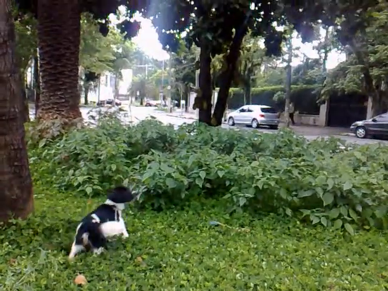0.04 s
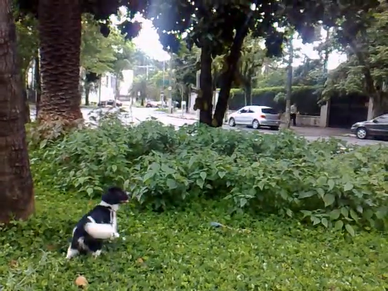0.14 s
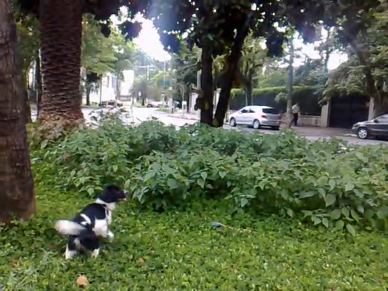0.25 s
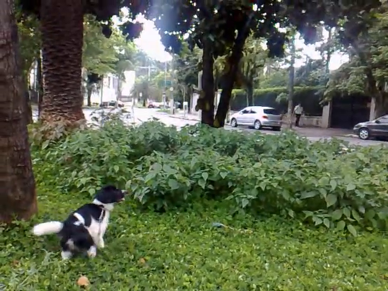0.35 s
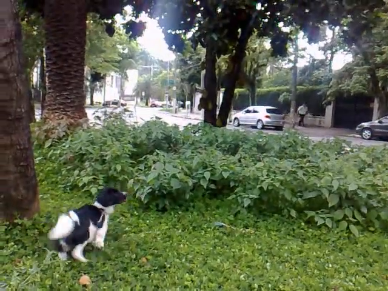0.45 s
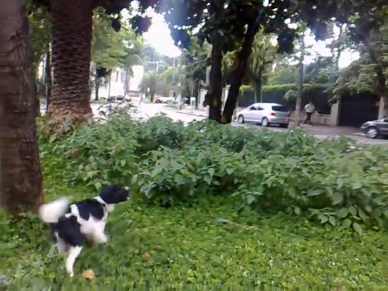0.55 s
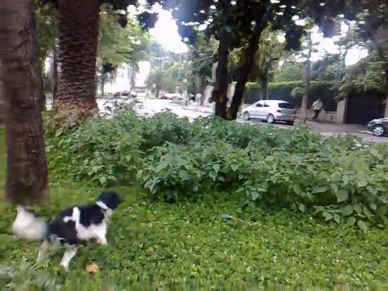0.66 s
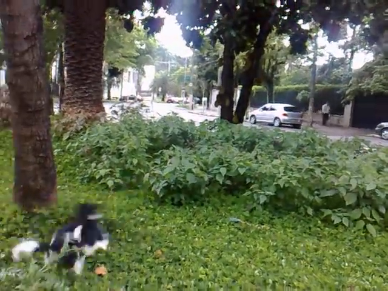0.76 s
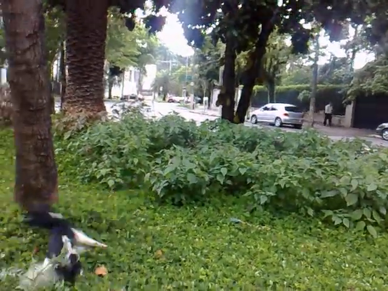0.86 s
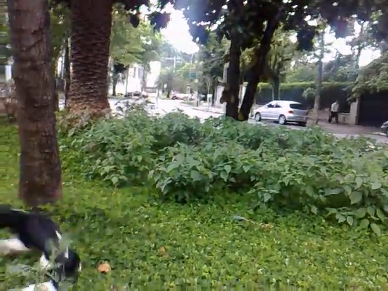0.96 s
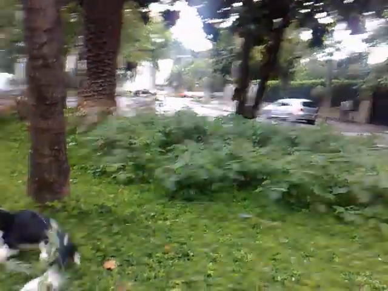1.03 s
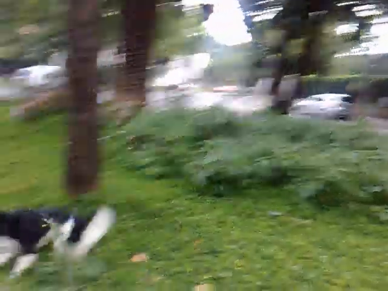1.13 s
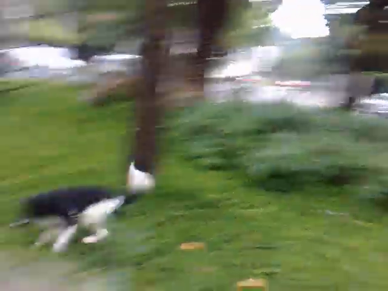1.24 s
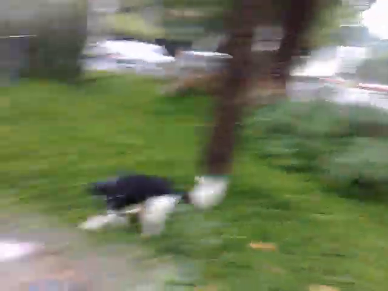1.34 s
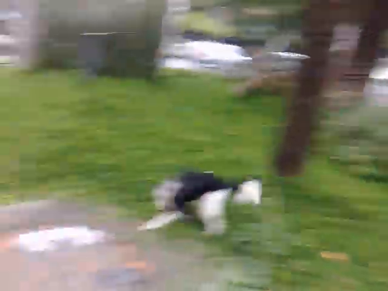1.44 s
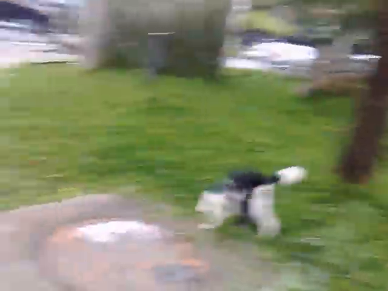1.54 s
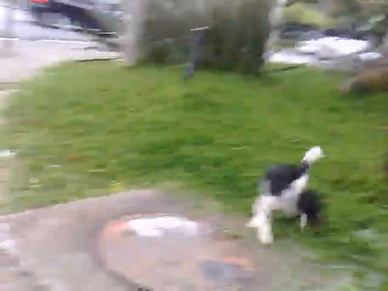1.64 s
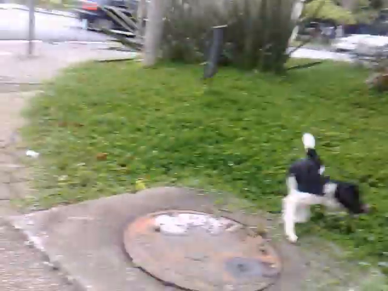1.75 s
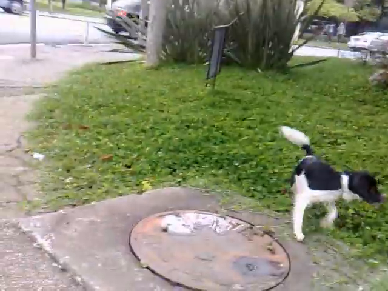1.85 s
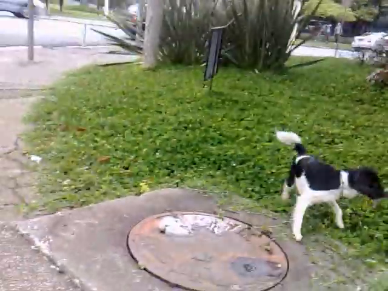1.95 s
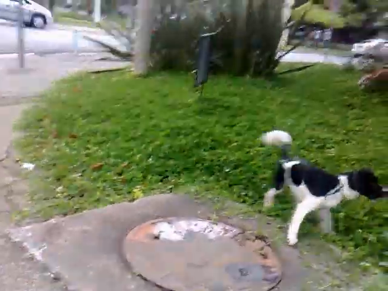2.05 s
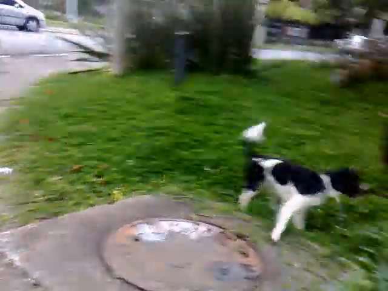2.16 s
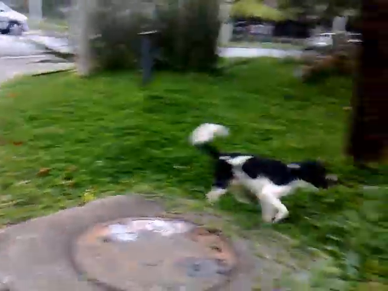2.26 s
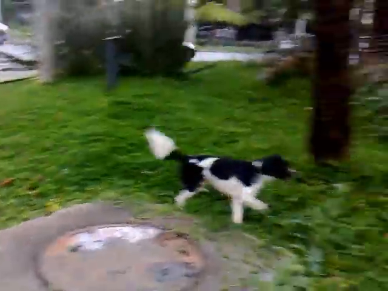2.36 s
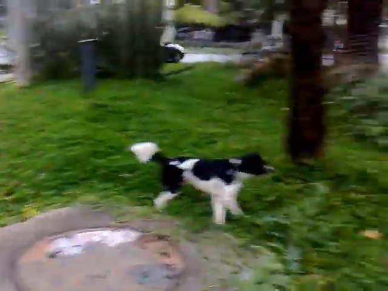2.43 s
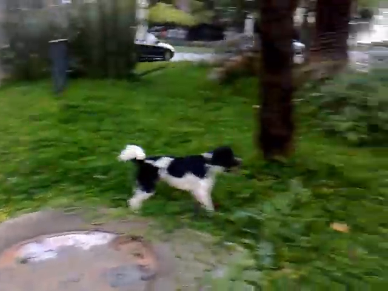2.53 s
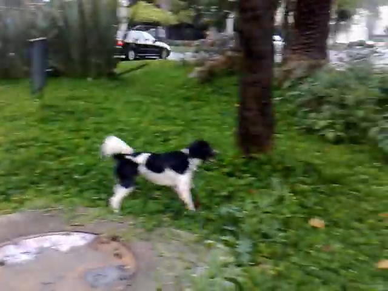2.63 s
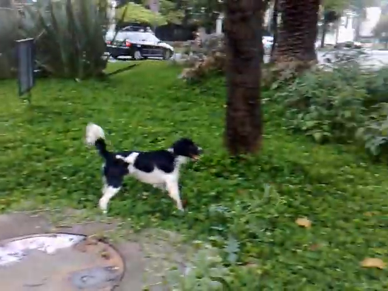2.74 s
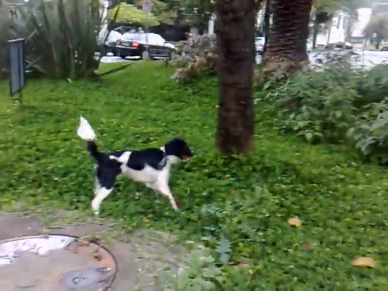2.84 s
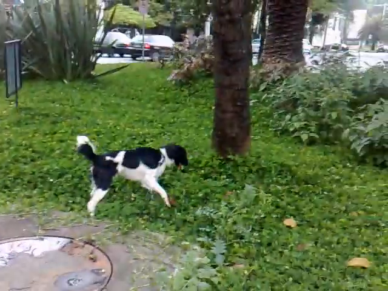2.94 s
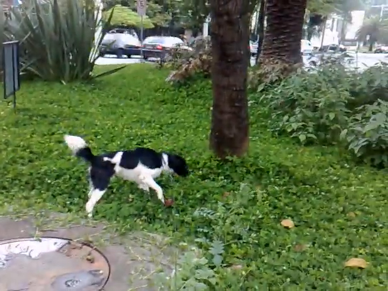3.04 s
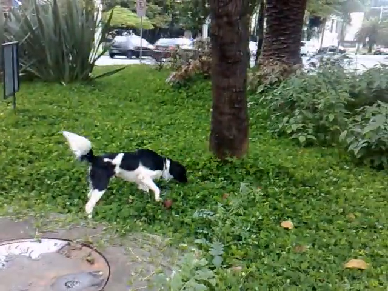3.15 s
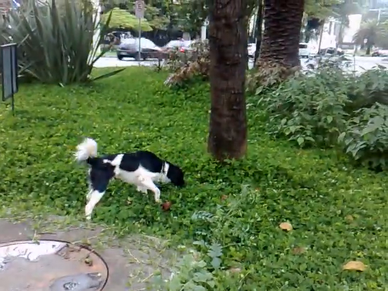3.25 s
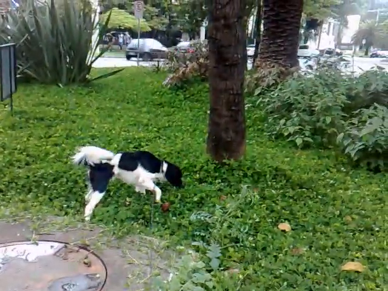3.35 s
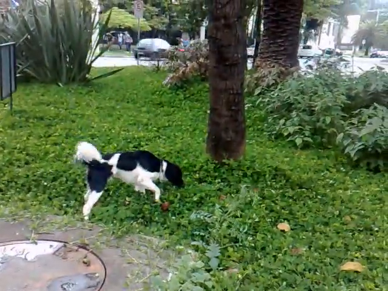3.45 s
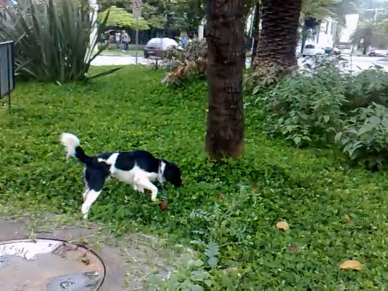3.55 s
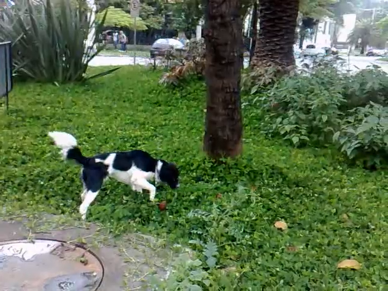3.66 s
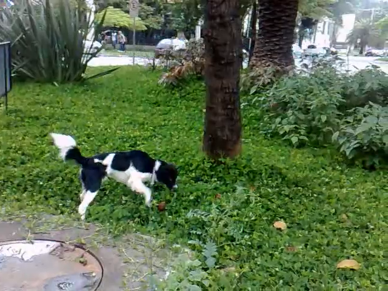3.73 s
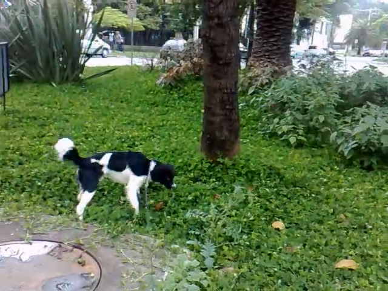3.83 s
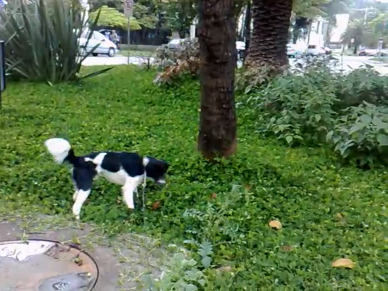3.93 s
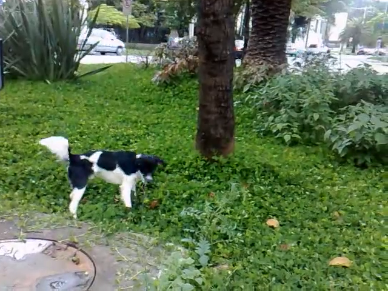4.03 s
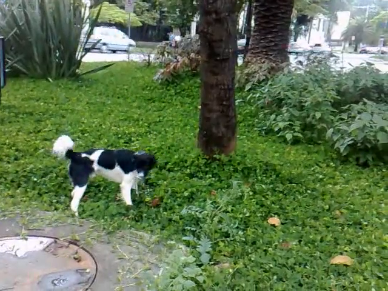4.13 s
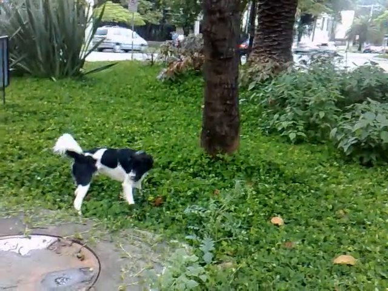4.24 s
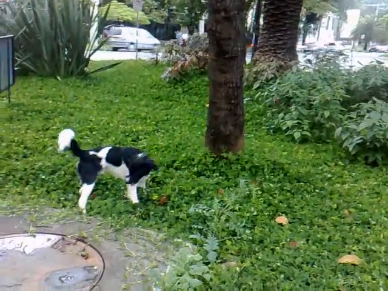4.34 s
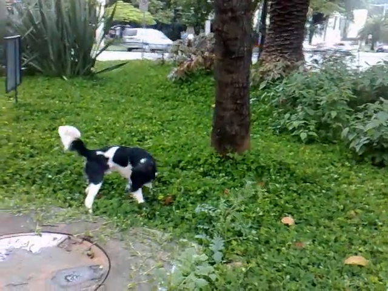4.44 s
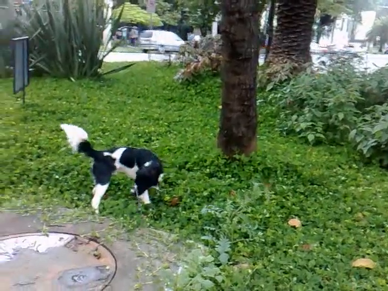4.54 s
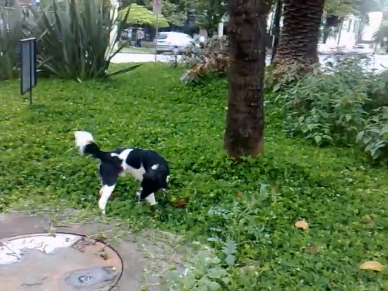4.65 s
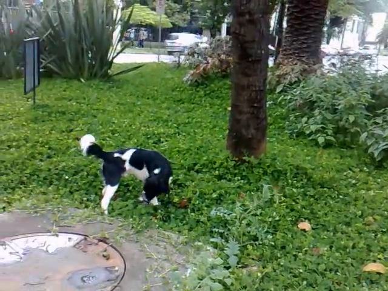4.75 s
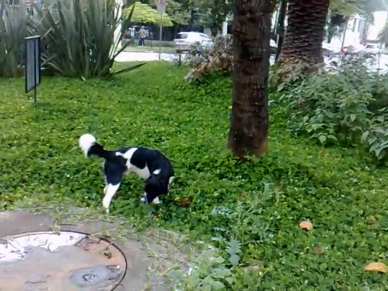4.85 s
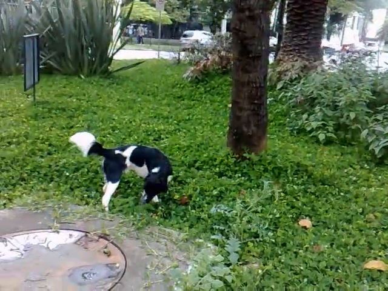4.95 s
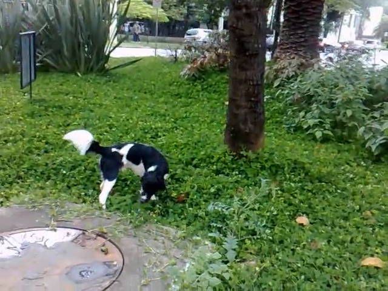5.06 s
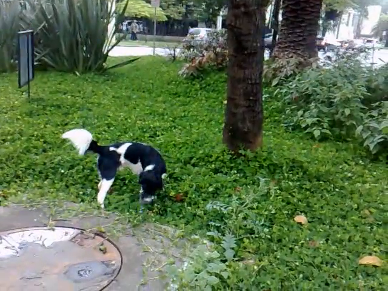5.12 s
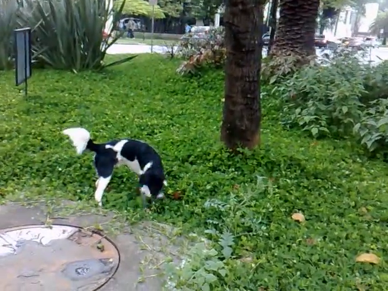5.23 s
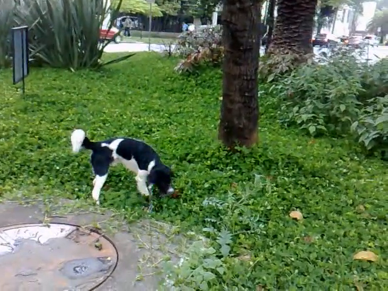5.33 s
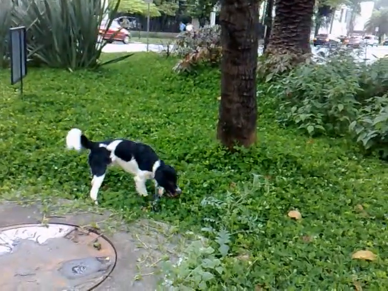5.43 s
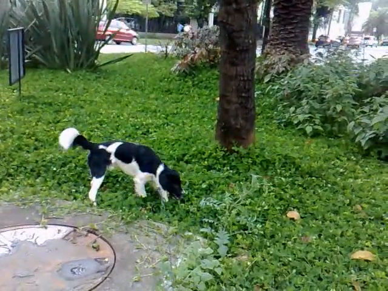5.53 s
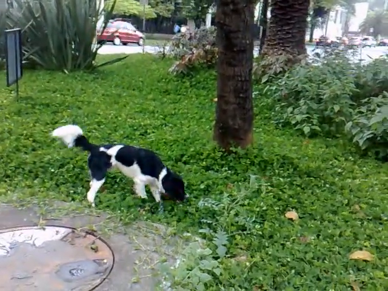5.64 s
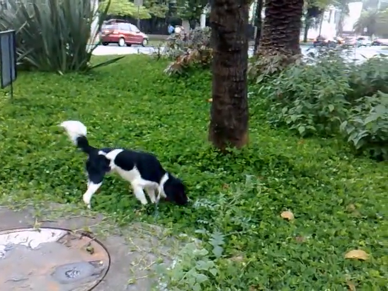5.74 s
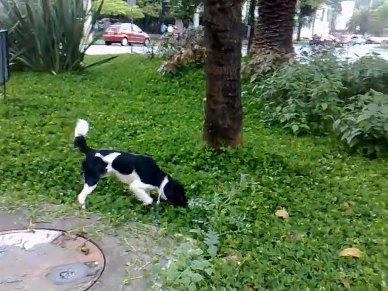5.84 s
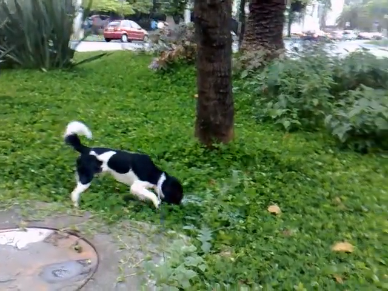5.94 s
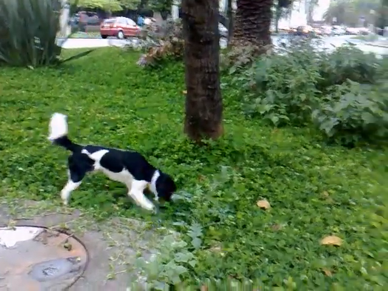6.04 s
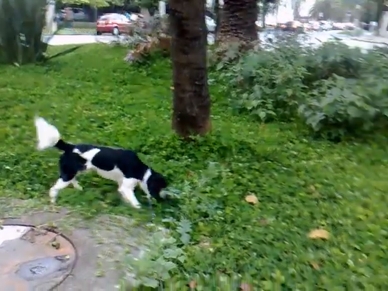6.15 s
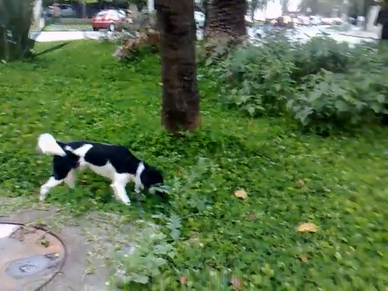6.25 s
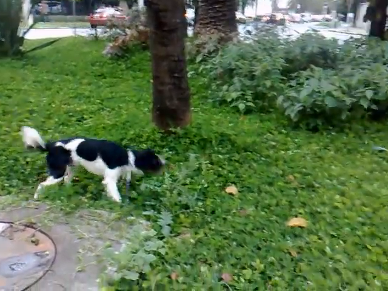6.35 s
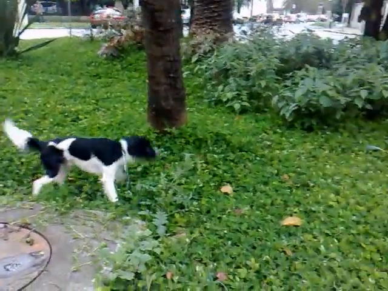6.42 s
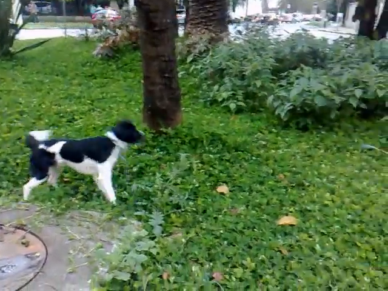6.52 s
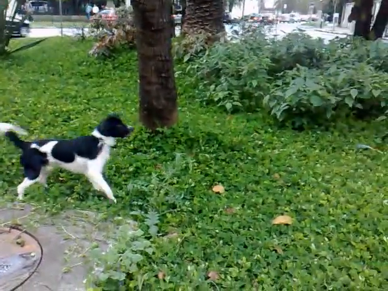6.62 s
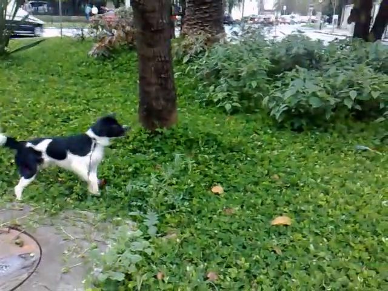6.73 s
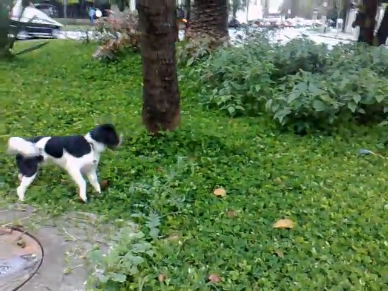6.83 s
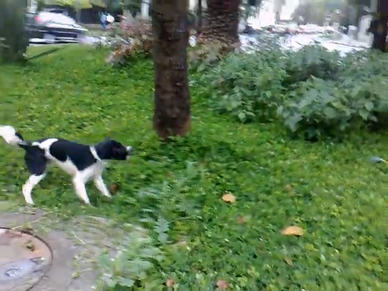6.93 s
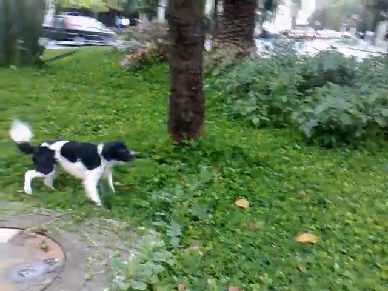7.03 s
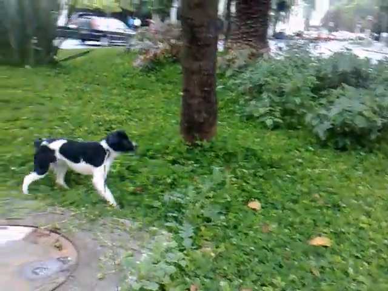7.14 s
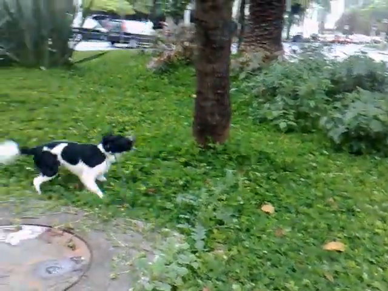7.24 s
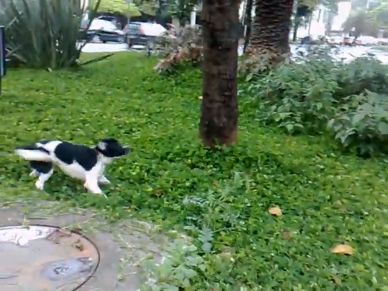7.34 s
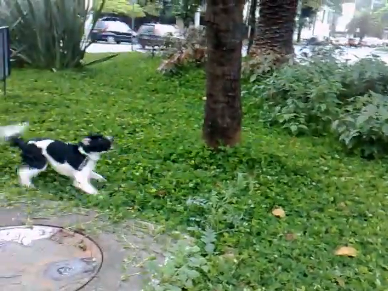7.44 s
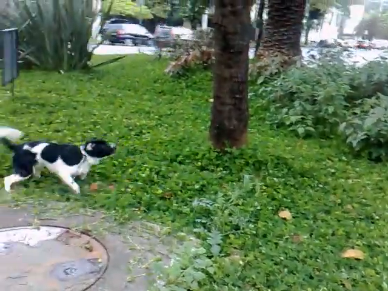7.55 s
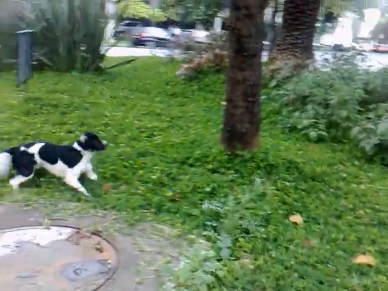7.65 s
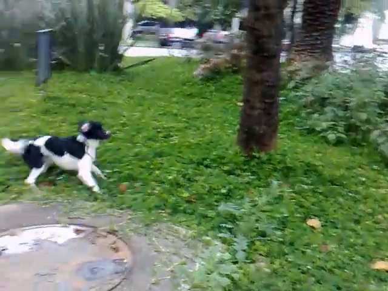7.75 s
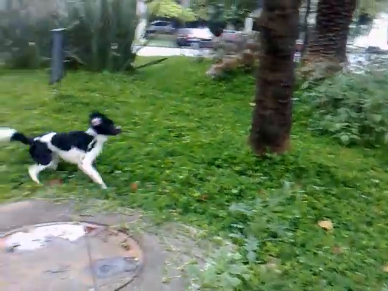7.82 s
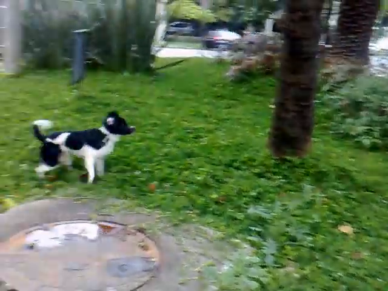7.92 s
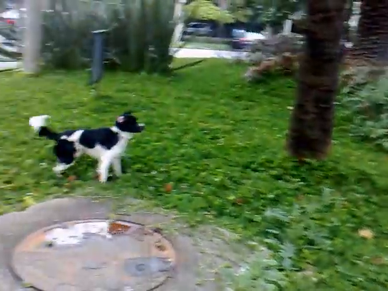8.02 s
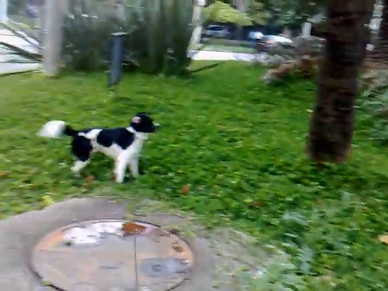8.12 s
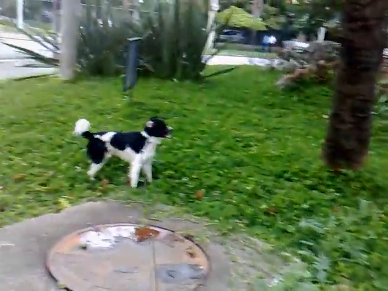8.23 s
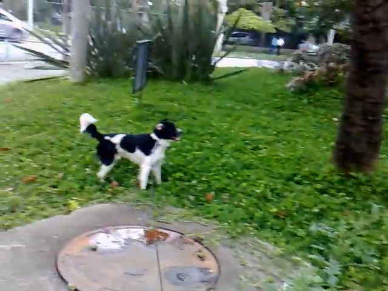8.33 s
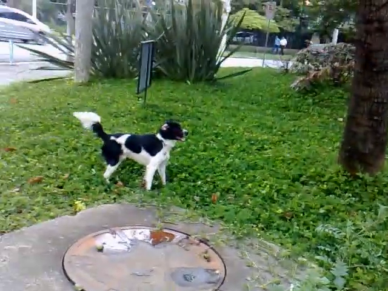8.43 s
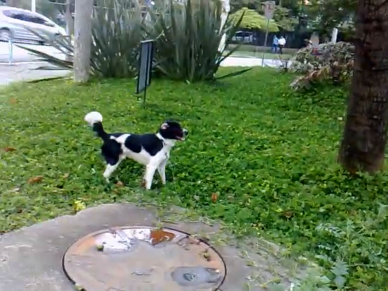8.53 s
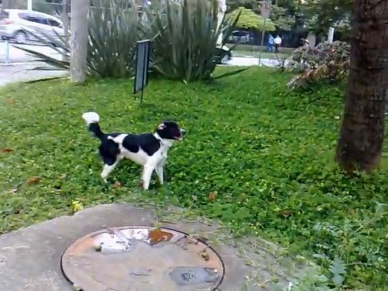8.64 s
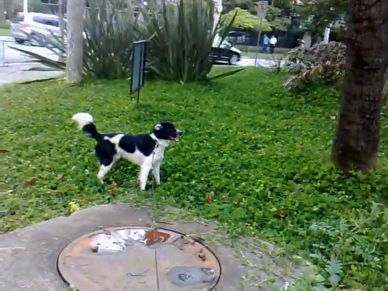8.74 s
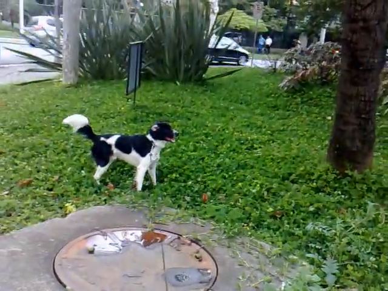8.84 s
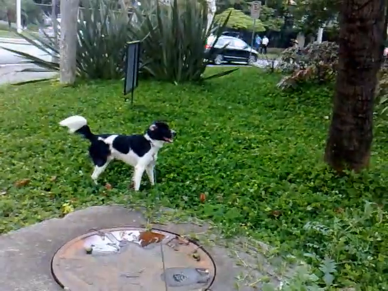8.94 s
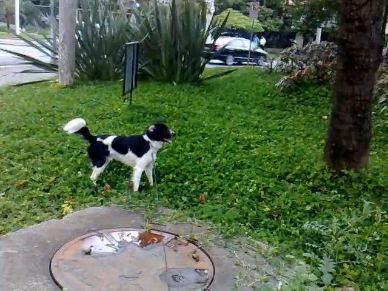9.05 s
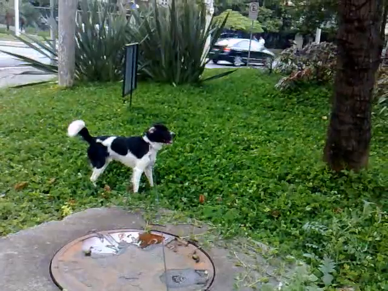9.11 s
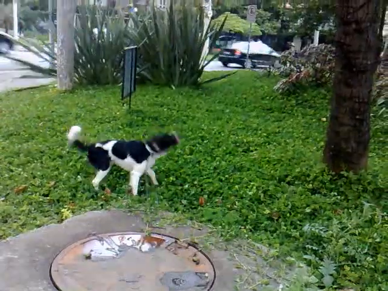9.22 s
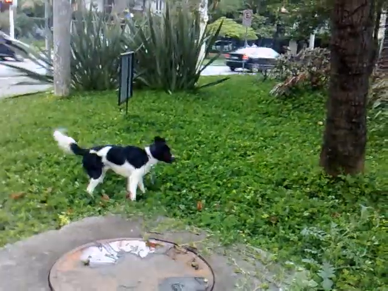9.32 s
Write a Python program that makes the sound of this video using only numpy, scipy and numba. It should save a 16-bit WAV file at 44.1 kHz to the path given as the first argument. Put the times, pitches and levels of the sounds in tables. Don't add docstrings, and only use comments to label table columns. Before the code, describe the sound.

A dog gives six short hoarse barks on a lawn beside a busy street, over tyre roar, engine drones and a leafy hiss.

```python
import sys
import numpy as np
from scipy import signal
from scipy.fft import rfft, irfft
from scipy.io import wavfile
from scipy.ndimage import uniform_filter1d, minimum_filter1d
from numba import njit

SR = 44100
rng = np.random.default_rng(int(sys.argv[2]) if len(sys.argv) > 2 else 0)


def bounce(signal):
    frames = np.transpose(np.atleast_2d(signal))
    limited = np.clip(frames, -1, 1)
    pcm = np.round(limited * 32767).astype(np.int16)
    wavfile.write(sys.argv[1], SR, pcm)


def invert_db(x):
    u = np.asarray(x, float) / 20
    return 10 ** u


N = 413658

# time_s, level_db
TRAFFIC = [(0, 0.5), (.75, 0), (2, -1), (3.8, 0), (6.4, -0.5), (7.4, 1.5), (9.38, 0.5)]
# time_s, level_db
TOP_HISS = [(0, 8.5), (.75, 6), (1, 1.5), (2.1, -1.5), (4.1, 3), (4.7, 1), (5.6, 4.5), (6.45, 0.5), (6.7, -6),
            (7.9, -6), (9.38, 0.5)]
# frequency_hz, level_db
ROAD_SPECTRUM = [(12, -36), (20, -15), (48, 0), (86, -2), (126, -4.5), (269, -6.5), (421, -14),
                 (1250, -12.5), (2380, -16.5), (2890, -14), (4920, -33.5), (6690, -37), (8140, -49),
                 (8850, -49.5), (15900, -55)]
ROAD_DB = -27
RUMBLE_FOLLOWS = 0.83

# loudest_s, audible_span_s, firing_hz, pull_hz_per_s, level_db
CARS = [
    (.5, 1.7, 86.7, 4, -27.5),
    (1.5, 0.84, 86.6, -3, -30),
    (3.149, 1.56, 97.3, 11.5, -31),
    (5.4, 3.26, 60.2, -1, -35),
    (8.2, .6, 112, -4, -33),
    (8.6, 0.67, 95, 5.5, -34.5),
    (9.4, 0.78, 101, -5.5, -33),
]
PASS_FADE_DB = 20

BRAKE_ON_S, BRAKE_OFF_S, BRAKE_DB, BRAKE_FADE_DB_PER_S = 3.99, 4.66, -55.5, 14
BRAKE_HZ, BRAKE_SAG_HZ_PER_S = 8750, 150
# time_s, extra_db, half_length_s
GRABS = [
    (4.05, 11, .012),
    (4.26, -11, .085),
    (4.287, 16, .01),
    (4.44, 1, .04),
    (4.482, 9, .01),
    (4.535, 6, .04),
]

# time_s, peak_db, length_s
PAW_STEPS = [(.04, -59.5, 0.037), (.74, -46, .04), (1.265, -49, 0.074), (1.477, -53, 0.089),
             (1.595, -53, .03), (1.86, -57, .03), (2.194, -54, .03), (2.222, -41, 0.047), (2.57, -57, .05),
             (2.897, -53, .05), (3.366, -53, .04), (3.65, -57, .04), (4.02, -52, .07), (5.73, -58, .06),
             (6.22, -56, .05), (7.0, -60, 0.042), (8.08, -54, 0.048)]

# time_s, peak_db, length_s, brightness_db
TWIG_CRACKS = [
    (2.222, -1, 0.00368, -8),
    (2.2264, -17, 0.0032, -14),
    (2.229, -20, 0.0022, -6),
    (2.2317, -16, 0.0031, -10),
]
TWIG_FROM_HZ, TWIG_TO_HZ = 5730, 2120
KNOCK_HZ, KNOCK_DB, CRACK_DB = 1500, -8, -12

# start_s, attack_s, hold_s, level_db, pitch_hz
BARKS = [
    (0.712, .062, 0.091, -13.5, 672.4),
    (6.447, 0.033, .078, -13.5, 701.8),
    (7.116, .02, .092, -6, 662.9),
    (7.363, 0.039, 0.072, -11.5, 648.5),
    (7.623, .04, .06, -10.5, 654.3),
    (9.328, .026, .085, -16.5, 705.4),
]
# attack_swell_db, early_tone_db, tone_break_share_of_hold, hold_sag_db, release_s
PHRASING = [(34.2, -6, .3, 7, .056), (39, 0.5, .5, 4.5, .058), (50, 4.5, .4, 13.5, .034),
            (24, 2, .35, 1.5, .06), (26.8, -0.5, .3, 5.5, .058), (38.8, -10.5, 0.42, 2, .05)]
# tone_break_db, throat_hz, cheek_hz, mouth_hz, third_hz
GAPES = [(2, 834, 1260, 1774, 2950), (-19.5, 960, 1385, 2300, 3210), (-11, 907, 1286, 1870, 2800),
         (-14, 828, 1240, 1730, 2830), (1, 750, 1390, 1620, 2740), (3, 830, 1220, 2060, 2960)]
# hoarseness_0_to_1, cheek_db, mouth_db, third_db, breath_db
COLOURS = [(.42, -3, -2, -0.5, -3.5), (.4, 4, -4, 2, 0.5), (.42, -1, 3.5, 4, 3),
           (.38, -5.5, 1.5, -5.5, -0.5), (.33, -7, -0.5, -8.5, -3.5), (0.4, 10.5, 0.5, -4.5, 2.5)]
# muffled_start_db, late_tone_db, mouth_drop_share, third_drop_share, facing_microphone_db
JAWS = [(-11.5, -4, .04, .02, -4), (1, 6, 0.19, 0.13, 6), (-0.5, 0.5, 0.14, .02, -1),
        (6, -5, 0.064, 0.062, -3), (0.5, 0.5, 0.039, .015, -8), (1.5, 0, .05, .02, 0)]
RASP_DB = (-1.5, 2, 1.5, 0, -2.5, 0.5)

PITCH_SHARE = (.92, 1.0, 1.0, 0.98, .96, .6)
CLEAR_DB = (0, 4.5, 0, 4, -1.2, 2)
BREAK_SHARE = (0.18, 0.15, 0.57, 0.52, 0, 0.6)
EARLY_SHARE = (0.92, 0.87, 0, 0, 0.61, 0.59)
LATE_SHARE = (0.43, 0.063, 0, 0.82, 0.85, 0)
HOARSE_SHARE = (.9, 1.0, 1.05, .95, .8, .2)
SAG_SHARE = (0, 0, 0.25, 1, 1.0, 0.68)
OPENING = (0, 0.21, 0.94, 1.0, 0.57, 0.12)
# level_db, then frequency_share
CHEEK_DB = (-8, -17.5, 2, 3, -8.5, 5)
CHEEK_SHARE = (0.99, 1, 0.95, 0.95, 0.94, 0.92)
# level_db, then rise and drop of frequency, share
MOUTH_DB = (-12, -6, -2, 7.5, 0, -4.5)
MOUTH_RISE_SHARE = (0.98, 0.94, 0.96, 1.0, 0.97, 0.99)
MOUTH_DROP = (0.44, 0, 0, 0, 0.72, 1.0)
# level_db, then drop of frequency, share
THIRD_DB = (-23, -13, -9.5, -10, -14.5, -1)
THIRD_DROP = (.2, 0, 0.33, 0.31, 0.84, 0.71)
BREATH_DB = (-43, -22.5, -18, -11.5, -20.5, -17.5)
THROAT_SHUT_HZ = 742
WIDEST_AT, RELEASE_DB = 0.55, 28

WIDTHS_HZ = (120, 110, 110, 170)
# centre_hz, width_hz, level_db
UPPER = [(3330, 32, 3), (4130, 370, -1), (4880, 400, -17), (6090, 260, -2.5), (7400, 480, -24)]
# frequency_hz, level_db_per_hz
BREATH_SPECTRUM = [(2060, 4), (3500, 2.5), (4830, 3), (6680, -7.5), (8280, -13), (10700, -18.5),
                   (14400, -29), (15900, -30)]
# delay_s, level_db
ECHOES = [(.031, -17), (.058, -58), (.094, -39), (.14, -44), (.21, -57)]
CEILING = 0.67


def rms_one(x):
    return x / np.sqrt(np.mean(x ** 2) + 1e-20)


def in_time(rows):
    s, *columns = np.transpose(rows)
    return [np.interp(np.arange(N) / SR, s, c) for c in columns]


def drift(rate):
    r = np.exp(-16 * np.pi * rate / SR)
    settle = 8000
    white = rng.standard_normal(N // 8 + settle + 2)
    slow = signal.lfilter([1], [1, -2 * r, r * r], white)[settle:]
    return np.interp(np.arange(N) / 8, np.arange(len(slow)), rms_one(slow))


def coloured(spectrum):
    hz, db = np.transpose(spectrum)
    grid = np.arange(N // 2 + 1) * SR / N + 1
    gain = invert_db(np.interp(np.log(grid), np.log(hz), db))
    return rms_one(irfft(rfft(rng.standard_normal(N)) * gain, N))


def band(x, low_hz, high_hz):
    return signal.sosfilt(signal.butter(2, [low_hz, high_hz], "band", fs=SR, output="sos"), x)


@njit
def resonate(x, hz, width_hz):
    r, y = np.exp(-np.pi * width_hz / SR), np.zeros(len(x))
    for i in range(2, len(x)):
        driven = (1 - r * r) / 2 * (x[i] - x[i - 2])
        y[i] = driven + 2 * r * np.cos(2 * np.pi * hz[i] / SR) * y[i - 1] - r * r * y[i - 2]
    return y


def evened(x, span_s):
    return x / np.sqrt(uniform_filter1d(x ** 2, size=int(span_s * SR)) + 1e-12)


def street():
    (roar_db,), (hiss_db,) = in_time(TRAFFIC), in_time(TOP_HISS)
    rumble_db = RUMBLE_FOLLOWS * roar_db
    spectrum, out = rfft(coloured(ROAD_SPECTRUM)), 0
    octave = np.log2(np.arange(len(spectrum)) * SR / N + 1)
    for centre in np.arange(4, 14.6, 0.5):
        part = irfft(spectrum * np.clip(1 - 2 * abs(octave - centre), 0, 1), N)
        low = np.clip(9 - centre, 0, 1)
        high = np.clip(2 * centre - 25, 0, 1)
        swell_db = low * rumble_db + (1.5 - low - high) * roar_db + high * hiss_db
        out = out + part * invert_db(swell_db + 1.15 * drift(1.8))
    return invert_db(ROAD_DB) * out


def engine():
    t, out = np.arange(N) / SR, 0
    wobble = 1 + 0.01597 * drift(10.0)
    swell_db = 2.4 * drift(5.2)
    for s, span, hz, pull, db in CARS:
        away = np.clip(2 * (t - s) / span, -2, 2)
        phase = 2 * np.pi * np.cumsum((hz + pull * away * span / 2) * wobble) / SR
        tone = np.sin(phase) + invert_db(-10.5) * np.sin(2 * phase)
        out = out + invert_db(db + swell_db - PASS_FADE_DB * away ** 4) * tone
    return out


def squeal():
    t = np.arange(N) / SR
    since = np.clip(t - BRAKE_ON_S, 0, 1)
    on = np.interp(t, [BRAKE_ON_S - 0.015, BRAKE_ON_S, BRAKE_OFF_S, BRAKE_OFF_S + 0.08], [0, 1, 1, 0])
    grab_db = sum(np.interp(t, [s - long, s, s + long], [0, extra_db, 0]) for s, extra_db, long in GRABS)
    db = BRAKE_DB - BRAKE_FADE_DB_PER_S * since + grab_db
    hz = BRAKE_HZ - BRAKE_SAG_HZ_PER_S * since
    whistle = resonate(resonate(rng.standard_normal(N), hz, 200.), hz, 300.)
    return on * invert_db(db + 2.2 * drift(25)) * rms_one(whistle)


def paws():
    t = np.arange(N) / SR
    burst = sum(np.interp(t, [s - 0.004, s, s + max(long, 0.005)], [0, invert_db(db), 0])
                for s, db, long in PAW_STEPS)
    crackle = rng.standard_normal(N) * invert_db(1.5 * rng.exponential(1, N))
    return burst * rms_one(band(crackle, 3200, 11600))


def twig():
    out, spit = np.zeros(N), rms_one(band(rng.standard_normal(N), 4300, 9500))
    for s, db, long, bright_db in TWIG_CRACKS:
        t, at = np.arange(int(long * SR)) / SR, int(s * SR)
        late, early = at + len(t) // 3, at - len(t) // 5
        swell = invert_db(db) * np.sin(np.pi * t / long) ** 2
        falling_hz = TWIG_TO_HZ + (TWIG_FROM_HZ - TWIG_TO_HZ) * np.exp(-3.0 * t / long)
        out[at:][:len(t)] += swell * np.sin(2 * np.pi * np.cumsum(falling_hz) / SR)
        out[late:][:len(t)] += invert_db(KNOCK_DB) * swell * np.sin(2 * np.pi * KNOCK_HZ * t)
        out[early:][:len(t)] += invert_db(CRACK_DB + bright_db) * swell * spit[at:][:len(t)]
    return out


def house_fronts(x):
    t = np.arange(int(0.9 * SR)) / SR
    reply = invert_db(-55.5 - 60 * t / 0.96) * rng.standard_normal(len(t)) * np.clip(t / 0.033, 0, 1)
    for s, db in ECHOES:
        reply[int(s * SR)] += invert_db(db)
    return signal.fftconvolve(x, band(reply, 300, 1900))[:N]


def bark_controls():
    rows, a = [], np.array
    for bark, gape, colour, phrase, jaw, rasp_db in zip(BARKS, GAPES, COLOURS, PHRASING, JAWS, RASP_DB):
        s, attack, hold, db, pitch_hz = bark
        break_db, throat_hz, cheek_hz, mouth_hz, third_hz = gape
        hoarse, cheek_db, mouth_db, third_db, breath_db = colour
        swell_db, early_db, break_at, sag_db, release = phrase
        muffled_db, late_db, mouth_drop, third_drop, facing_db = jaw
        muffled_db = muffled_db * a(EARLY_SHARE)
        into_hold = hold * a([0, break_at, break_at + WIDEST_AT * (1 - break_at), 1])
        times = s + a([0, *(attack + into_hold), attack + hold + release])
        tone_db = break_db * a(BREAK_SHARE) + early_db * a(EARLY_SHARE) + late_db * a(LATE_SHARE)
        rows.append(np.transpose([
            times,
            db - sag_db * a(SAG_SHARE) - a([swell_db, 0, 0, 0, 0, RELEASE_DB]),
            THROAT_SHUT_HZ + (throat_hz - THROAT_SHUT_HZ) * a(OPENING),
            mouth_hz * (a(MOUTH_RISE_SHARE) - mouth_drop * a(MOUTH_DROP)),
            mouth_db + a(MOUTH_DB) + muffled_db,
            third_hz * (1 - third_drop * a(THIRD_DROP)),
            third_db + a(THIRD_DB) + muffled_db,
            breath_db + a(BREATH_DB) + 0.62 * muffled_db,
            pitch_hz * a(PITCH_SHARE),
            a(CLEAR_DB) + tone_db,
            hoarse * a(HOARSE_SHARE),
            cheek_hz * a(CHEEK_SHARE),
            cheek_db + a(CHEEK_DB) + muffled_db,
            facing_db + 0 * times,
            rasp_db + 0 * times]))
    return in_time(np.vstack(rows))


def barks():
    (db, throat_hz, mouth_hz, mouth_db, third_hz, third_db, breath_db,
     pitch_hz, clear_db, hoarse, cheek_hz, cheek_db, facing_db, rasp_db) = bark_controls()
    hoarse, t = np.clip(hoarse, 0, 1), np.arange(N) / SR
    sounding = 0
    for (s, attack, hold, *_), (*_, release) in zip(BARKS, PHRASING):
        corners = s + np.cumsum([-0.002, 0.013, attack + hold + release - 0.011, 0.014])
        sounding = sounding + np.interp(t, corners, [0, 1, 1, 0])

    phase = np.cumsum(pitch_hz * (1 + 0.07 * hoarse * drift(120))) / SR
    cycle = np.cos(2 * np.pi * phase)
    uneven_db = 6 * hoarse * drift(200) + 5.0 * np.cos(2 * np.pi * phase / 3)
    closing = np.diff(np.floor(phase), prepend=0) * invert_db(uneven_db)
    puffs = rng.standard_normal(N) * (2.3 + cycle)
    source = rms_one(closing) + 0.77 * hoarse * puffs

    voice = invert_db(clear_db + 2.5 + 2.6 * hoarse * drift(78)) * np.sin(2 * np.pi * phase)
    throat_db = np.minimum(0.5 - clear_db, 0)
    centres_hz = (throat_hz, cheek_hz, mouth_hz, third_hz)
    levels_db = (throat_db, cheek_db, mouth_db, third_db)
    for hz, width_hz, level_db, sign in zip(centres_hz, WIDTHS_HZ, levels_db, (1, -1, 1, -1)):
        ringing = resonate(resonate(source, hz, width_hz), hz, 2 * width_hz)
        voice = voice + sign * invert_db(level_db) * evened(ringing, 0.032)

    voice += invert_db(breath_db + 2 + 2 * drift(58)) * coloured(BREATH_SPECTRUM) * (1 + 0.25 * cycle)
    teeth_hiss = rms_one(band(puffs, 6400, 11700))
    voice += invert_db(breath_db + 2 * facing_db - 20) * teeth_hiss

    upper = 0
    for hz, width_hz, level_db in UPPER:
        ringing = rms_one(resonate(source, np.full(N, 1. * hz), 1. * width_hz))
        upper = upper + invert_db(level_db + 5.0 * drift(23)) * ringing
    high_pass = signal.butter(4, 2900, "high", fs=SR, output="sos")
    voice += invert_db(breath_db - 13.5) * signal.sosfilt(high_pass, upper)

    valleys = ((throat_hz + cheek_hz, cheek_db),
               (cheek_hz + mouth_hz, cheek_db + mouth_db),
               (mouth_hz + third_hz, 2 * third_db))
    for twice_hz, twice_db in valleys:
        rasp = resonate(resonate(rng.standard_normal(N), twice_hz / 2, 350.), twice_hz / 2, 500.)
        voice += invert_db(twice_db / 2 + rasp_db + 3.0) * hoarse * rms_one(rasp)
    voice += invert_db(-22.5) * rms_one(band(source, 133, 385))
    return invert_db(db + 13.5) * sounding * voice


def scene():
    dog = barks()
    background = street() + engine() + squeal()
    return (background + paws() + twig() + house_fronts(dog) + dog)[None]


@njit
def duck(over_db, attack, release_db):
    cut, now = np.zeros(len(over_db)), 0.
    for i in range(len(over_db)):
        if over_db[i] > now:
            now = now + attack * (over_db[i] - now)
        else:
            now = max(now - release_db, 0.)
        cut[i] = now
    return cut


def top_cut(x):
    return signal.sosfilt(signal.butter(12, 16060, fs=SR, output="sos"), x)


def record(dry):
    level_db = 10 * np.log10(uniform_filter1d(dry[0] ** 2, size=220) + 1e-12)
    cut_db = duck(0.69 * (level_db + 16.0), 1 / (0.05 * SR), 8.5 / SR)
    x = dry[0] * invert_db(-cut_db)
    room = np.minimum(CEILING / (abs(x) + 1e-9), 1)
    limit = uniform_filter1d(minimum_filter1d(room, size=44), size=44)
    x = signal.sosfilt(signal.cheby2(12, 60, 16300, fs=SR, output="sos"), x * limit)
    return top_cut(x[None])


dry = scene()
out = record(dry)
bounce(out)
```